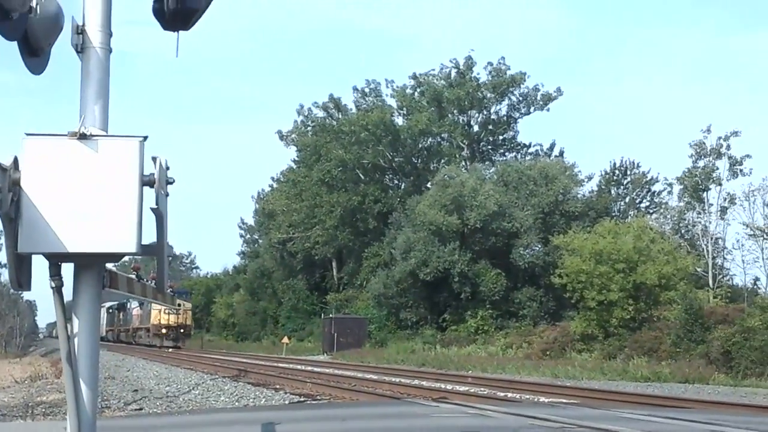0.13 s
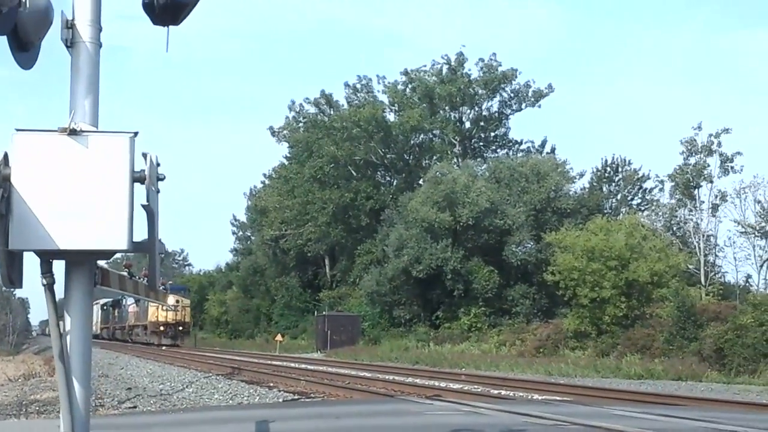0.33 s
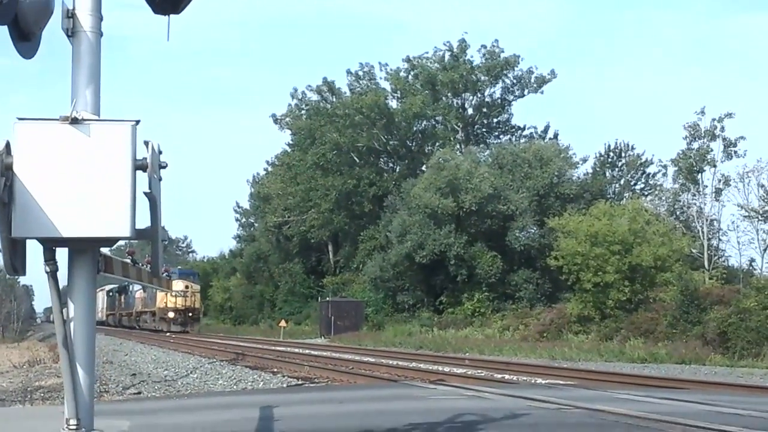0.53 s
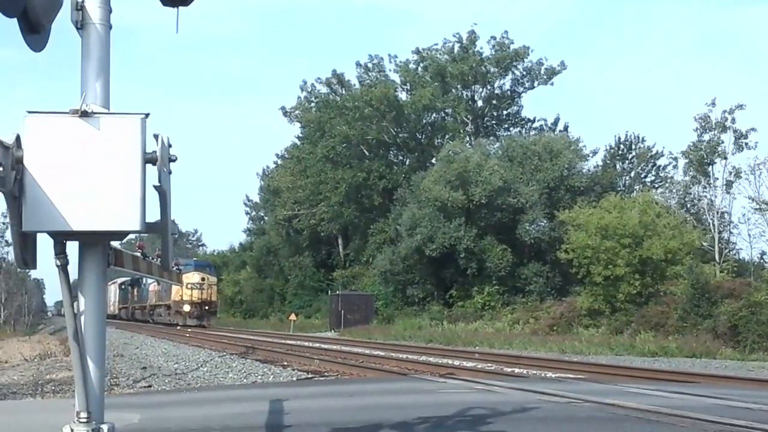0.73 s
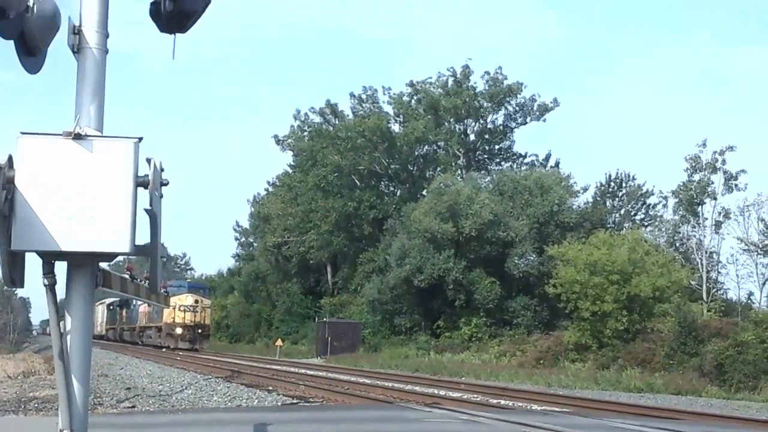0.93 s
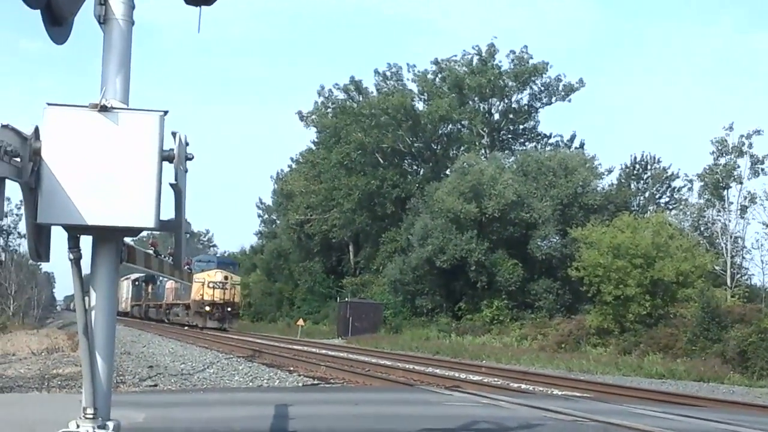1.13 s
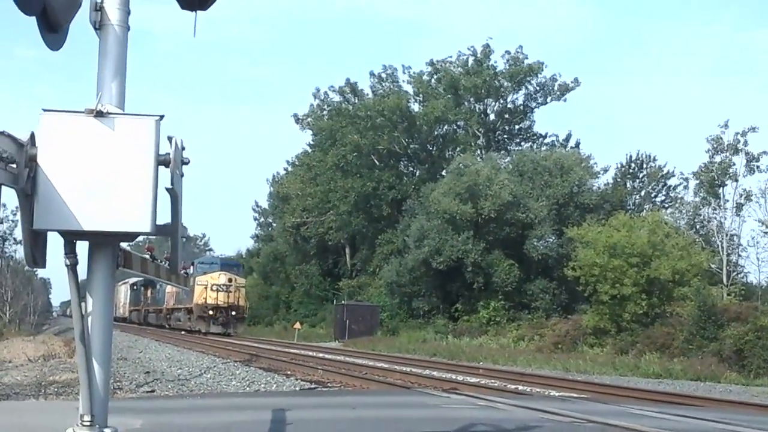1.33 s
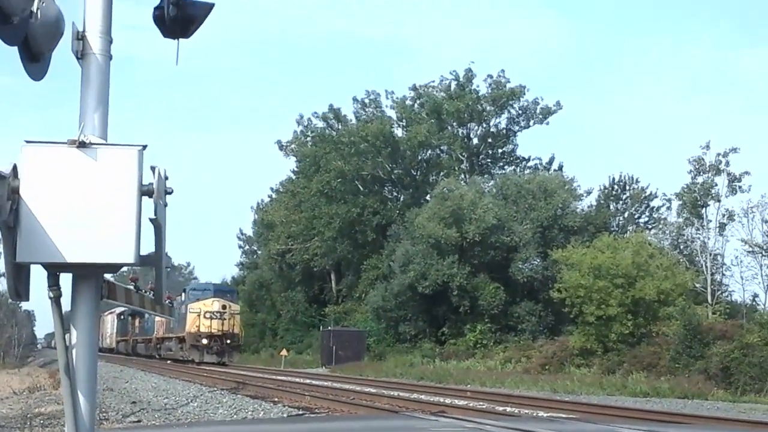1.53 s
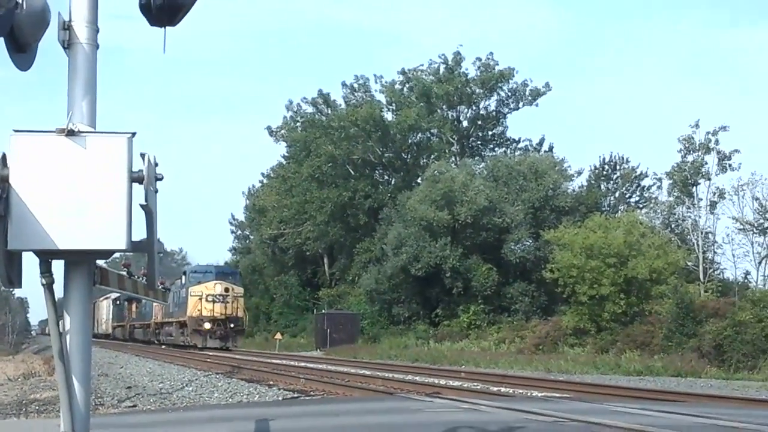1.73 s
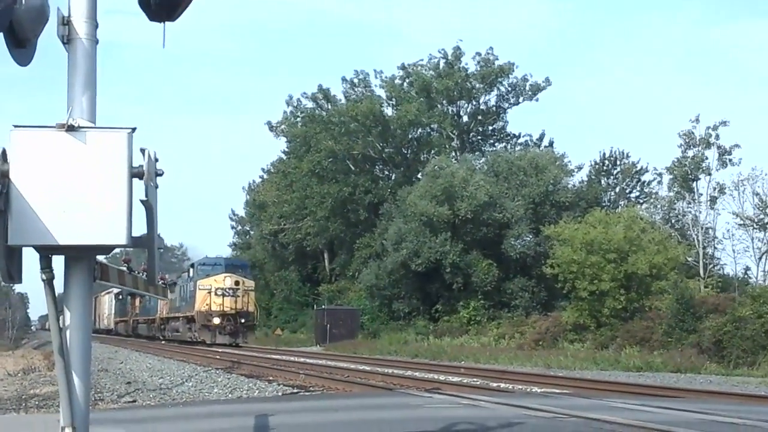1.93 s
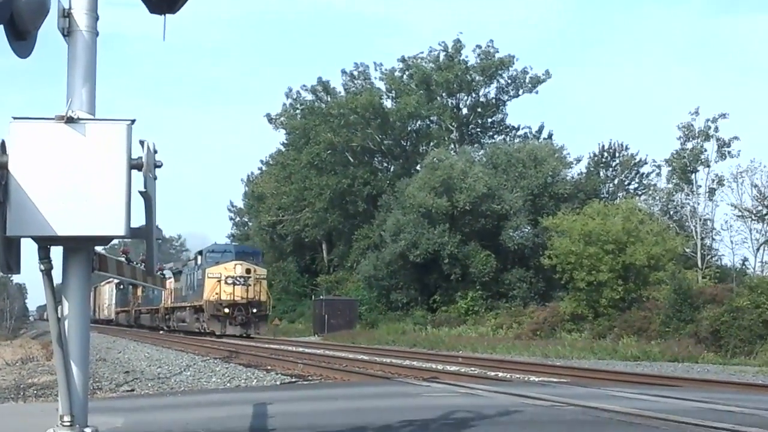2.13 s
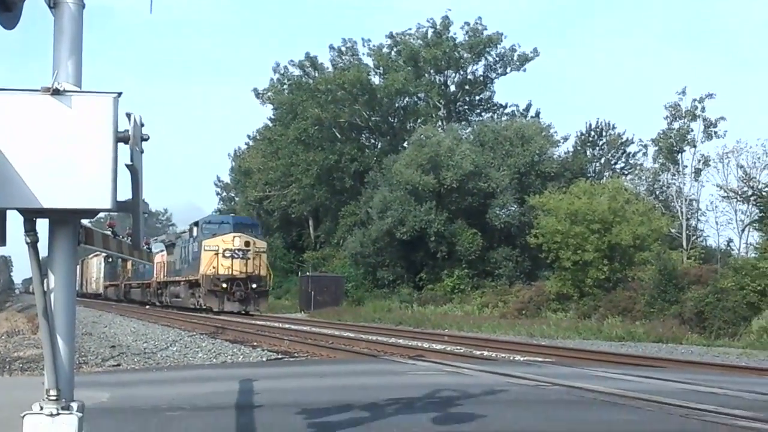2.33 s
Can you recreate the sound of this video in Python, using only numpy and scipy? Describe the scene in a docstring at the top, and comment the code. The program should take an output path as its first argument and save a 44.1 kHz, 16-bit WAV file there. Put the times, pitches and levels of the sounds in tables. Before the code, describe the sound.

A freight locomotive's five-note air horn dominates. Low diesel rumble and soft rail hiss come first; at about 0.2 seconds the chord bursts in, slightly sharp, quickly settling into a loud, brassy, shimmering blast. From roughly 1.4 seconds it sags and dulls, stopping near 1.9. Flat, smeared echoes from trees and distant woods linger over rumble, hiss and faint whine until the end, in wide outdoor stereo.

```python
"""A five-bell air horn on an approaching freight locomotive gives one long blast at a level crossing.
Each bell is a stack of overtones; the chord starts sharp, settles, then sags and dulls as the valve closes.
Trees along the line and distant woods throw it back, as delayed copies lower in pitch and a long noise-like tail.
Diesel rumble and rail hiss, both shaped noise, lie underneath with a faint whine.
The two microphone channels are opposed in the bass."""
import sys
import numpy as np
from scipy import signal
from scipy.fft import rfft, irfft, next_fast_len
from scipy.io import wavfile
from scipy.ndimage import map_coordinates

SR = 44100
rng = np.random.default_rng(int(sys.argv[2]) if len(sys.argv) > 2 else 0)


def master_out(mix):
    """Clip the mix to full scale and print it as 16-bit PCM to the path in sys.argv[1]."""
    frames = np.transpose(np.atleast_2d(mix))
    ceiling = np.clip(frames, -1, 1)
    pcm = np.round(ceiling * 32767).astype(np.int16)
    wavfile.write(sys.argv[1], SR, pcm)


N = 110250
T = np.arange(N) / SR  # time of every sample, in seconds

# The train. Each row: time in seconds, diesel level in dB, rail hiss level in dB, hiss left minus right in dB.
TRAIN_LEVELS = [(0, -35, -31.5, -3), (.3, -32, -31, -5.5), (.7, -35, -19.5, -10.5), (1.3, -32, -22.5, -1),
                (2.0, -29.5, -29.5, -0.5), (2.5, -28.5, -30.5, -1.5)]
# Tone colour of the diesel rumble. Each row: frequency in Hz, level in dB.
RUMBLE_COLOUR = [(20, -20), (32, -14.5), (47, -7), (62, -5.5), (80, -6.5), (98, 0.5), (125, -10),
                 (180, -13.5), (260, -9.5), (400, -17), (900, -22.5), (2000, -52.5)]
# Tone colour of the rail hiss. Each row: frequency in Hz, level in dB.
HISS_COLOUR = [(300, -31.5), (700, -15), (1000, -3), (1300, -11.5), (1900, -4), (3000, -3.5), (4000, -1.5),
               (5200, -0.5), (6300, -11.5), (8000, -20.5), (9500, -46)]
# Likeness of the two channels for sound from all around. Each row: frequency in Hz, likeness from -1 to 1.
CHANNEL_LIKENESS = [(100, -.96), (200, -.95), (330, -0.9), (600, -0.35), (1000, 0.14), (2000, -0.0031)]
# Tone colour of the tree echoes. Each row: frequency in Hz, level in dB.
TREE_COLOUR = [(330, -9.5), (650, -9), (880, -10.5), (1050, 7), (1400, 6), (2500, 1), (5000, 1.5),
               (9000, 4.5)]
# Tone colour of the long tail from the woods. Each row: frequency in Hz, level in dB.
WOODS_COLOUR = [(330, -18.5), (500, -12), (650, -19), (880, -13), (1100, -3), (2000, -5), (3200, -14.5),
                (6000, -7.5)]
# How long the woods ring on. Each row: frequency in Hz, time to fall by 60 dB in seconds.
WOODS_FADE_TIME = [(300, 2.27), (700, 3.21), (2000, 3.52), (5000, 2.64)]
# The four low bells. Each row: fundamental in dB, octave in dB, upper overtones in dB.
LOW_BELL_LEVELS = [(-22.5, -14, -3.5), (-21.5, -21.5, -3.5), (-18, -18.5, 0), (-21.5, -29, 0.5)]
# The top bell, a single row: fundamental in dB, octave in dB, upper overtones in dB.
TOP_BELL_LEVELS = (-12, -40, 6.64)
# Drift of pitch. Each row: time in seconds, low bells in percent, top bell in percent.
PITCH_DRIFT = [(.2, 1.9, .35), (.31, .9, .2), (.4, .45, .05), (.5, .15, 0), (.68, -.2, 0), (1.0, -.1, 0),
               (1.25, -.05, -.05), (1.45, -.7, -.25), (1.72, -1.4, -.85)]
# Air supply. Each row: time in seconds, level in dB, brightness corner in Hz, brassiness in dB.
AIR_SUPPLY = [(.19, 0.5, 1560, -8), (.23, 1.5, 2760, -8), (.28, 4, 4720, -3), (.34, 1, 8340, 1.5),
              (.55, 1, 8100, -0.5), (.85, 4.5, 8000, -1.5), (1.33, 1.5, 7240, 1), (1.5, 3.5, 3240, -1),
              (1.65, 6, 2040, 1.5), (1.78, 2, 1320, 0.5), (1.9, -1.5, 854, 10.5)]
# Upper overtones shared by all bells. Each row: frequency in Hz, level in dB.
OVERTONE_LEVELS = [(950, -23), (1150, -40), (1320, -34), (1550, -34), (1700, -33.5), (2000, -37.5),
                   (2300, -34), (2600, -36.5), (2780, -28), (3250, -36), (3550, -35), (3900, -39),
                   (4300, -35), (5100, -35.5), (6300, -44), (8000, -55.5), (9500, -67)]
# The way to the microphone. Each row: time in seconds, direct level in dB, tree echo level in dB,
# nearness (0 is far, 1 is near, and it may pass 1).
PATH_LEVELS = [(.2, 0.5, -1, 0), (.75, -2, 0.5, 0.04), (1.0, -3, 0.5, .1), (1.35, -2, 2, 0.27),
               (1.62, -6, 3, 1), (1.8, -1, -2, 1.5), (1.95, -2, -6.5, 0.9)]
# Direct sound at the microphone. Each row: frequency in Hz, lead of the left channel in radians.
LEFT_LEAD = [(330, -2.8), (386, -2.7), (445, -1.7), (515, -3.5), (655, -2.95), (770, -2.8), (890, -1.5),
             (1030, -.2), (1300, 1.6), (2000, 7.5), (3300, 20), (5200, 33), (9000, 54)]
# Change of that lead when near. Each row: frequency in Hz, change in radians.
NEAR_LEAD_CHANGE = [(330, 0.61), (386, 0.11), (445, -0.59), (515, 1.64), (655, 0.54), (770, .6),
                    (890, -0.33), (1030, 1.5), (1300, -0.94), (2000, 0.15)]
# Balance of direct sound and tree echoes. Each row: frequency in Hz, left minus right in dB.
LEFT_RIGHT_BALANCE = [(330, -2), (480, 4.5), (650, -1), (1000, -0.5), (1400, 3), (2000, -9), (3000, -6),
                      (5200, -9), (6500, 3.5), (9000, 11.5)]

WHINE_HZ, WHINE_START_DB, WHINE_RISE_DB_PER_S = 926, -39.5, 0.5
# the most sideways trees: share of pitch lost, and how much weaker they are
DOPPLER_LOSS, TREE_FADE_DB = .085, 9.5
TREE_DELAY_SCALE_S = .12  # multiplied by a random factor for each tree

LOW_BELLS_HZ, TOP_BELL_HZ = [330.3, 385.6, 445.6, 513.8], 650.4
START_S, ATTACK_S, RELEASE_S = .172, .045, 0.039
LOW_STOPS_S, TOP_STOP_S = [1.91, 1.94, 1.91, 1.88], 1.815
ROLL_OFF = 4.14  # steepness of the overtones above the brightness corner
# air turbulence on the way: swing in dB, random knots a second, phase swing
SHIMMER_DB, SHIMMER_RATE, SMEAR_RAD_PER_KHZ = 2.5, 7.956, 0.14
# slower fading as the path over the ground changes: swing in dB, random knots a second
FADING_DB, FADING_RATE = 1.73, 3.485
TOP_BELL_ECHO_DB = -5.5  # this bell points down the track, so less of it reaches the trees
TOP_BELL_NEAR_DB = 0.5  # gain per unit of nearness, as the locomotive closes in

TOP_HZ = 9650  # nothing is kept from here up
AGC_DB, AGC_S, AGC_SLOPE = -10.5, 0.3, 0.25  # gain control: level where it bites, averaging time, strength


def amp(db):
    """Turn decibels into gain."""
    return np.exp(np.asarray(db) * np.log(10) / 20)


def unit(x):
    """Scale to an rms (average strength) of 1."""
    return x / np.sqrt(np.mean(x ** 2) + 1e-20)


def along(points, hz):
    """Read a value between (Hz, value) points on a log frequency axis."""
    f, v = np.transpose(points)
    return np.interp(np.log(hz + 1), np.log(f + 1), v)


def curves(rows):
    """Draw one curve over time for each column after the time."""
    s, *cols = np.transpose(rows)
    return [np.interp(T, s, c) for c in cols]


def wobble(rate, size=400):
    """Make a smooth random curve through `rate` random knots a second."""
    s = np.linspace(0, T[-1], size)
    smooth = map_coordinates(rng.standard_normal(size), [s * rate], mode="wrap")
    return np.interp(T, s, smooth)


def filtered(x, response):
    """Change the level and phase of each frequency in x by a response."""
    m = next_fast_len(N + SR // 4)  # spare room at the end
    spectrum = rfft(x, m) * response(np.fft.rfftfreq(m, 1 / SR))
    return irfft(spectrum, m)[..., :N]


def diffuse(pair, colour):
    """Colour two signals and mix them as the microphone hears sound from all around."""
    def response(hz):
        likeness = np.clip(along(CHANNEL_LIKENESS, hz), -.98, .98)
        turn = np.arccos(likeness) / 2
        return amp(along(colour, hz)) * np.array([np.cos(turn), np.sin(turn)])
    mid, side = filtered(pair, response)
    return np.array([mid + side, mid - side])


def diesel_rumble(level_db):
    """The engine is noise shaped towards the bass, with a small random wobble in level."""
    level = amp(level_db + 1.2 * wobble(12))
    return level * unit(diffuse(rng.standard_normal((2, N)), RUMBLE_COLOUR))


def rail_hiss(level_db, pan_db):
    """Wheels on rail make bright noise that shifts between the channels."""
    pan = np.array([pan_db, -pan_db]) / 2
    level = amp(level_db + pan + 0.17 * wobble(6.69))
    return level * unit(diffuse(rng.standard_normal((2, N)), HISS_COLOUR))


def whine():
    """A faint steady tone wavers in level and phase, separately in each channel."""
    pair = []
    for ear in range(2):
        level = amp(WHINE_START_DB + WHINE_RISE_DB_PER_S * T + 4.5 * wobble(6.2))
        pair.append(level * np.sin(2 * np.pi * WHINE_HZ * T + 1.1 * wobble(18)))
    return np.array(pair)


def train():
    """The approaching train adds engine rumble, rail hiss and whine."""
    diesel_db, hiss_db, pan_db = curves(TRAIN_LEVELS)
    return diesel_rumble(diesel_db) + rail_hiss(hiss_db, pan_db) + whine()


def woods(pair):
    """Distant woods smear the sound into a long tail of fading noise, each pitch at its own rate."""
    hz, t, z = signal.stft(rng.standard_normal((2, 2 * SR)), SR, nperseg=256)
    fade = amp(-60 * t / along(WOODS_FADE_TIME, hz)[:, None])
    build_up = 1 - np.exp(-t / 0.045)
    tail = signal.istft(z * fade * build_up, SR, nperseg=256)[1]
    return signal.fftconvolve(pair, tail / np.linalg.norm(tail[0]), axes=1)[:, :N]


def trees(x, count=48):
    """Trees beside the track miss part of the Doppler rise, so their echoes sound flat and late."""
    pair = np.zeros((2, N))
    for ear in pair:
        for i, (place, lag) in enumerate(rng.random((count, 2))):
            aside = ((i + place) / count) ** 1.3  # 0 is ahead, 1 is most sideways
            first_delay = TREE_DELAY_SCALE_S * (.1 + lag * (.4 + aside))
            delay = first_delay + DOPPLER_LOSS * aside * (T - START_S)  # a growing delay lowers the pitch
            ear += amp(-TREE_FADE_DB * aside) * np.interp(T - delay, T, x)
    return unit(pair) * np.std(x)


def bell(hz, levels, stop_s, drift_percent):
    """A diaphragm and its flare give a harmonic series whose top needs full air pressure."""
    first_db, octave_db, upper_db = levels
    level_db, corner_hz, brass_db = curves(AIR_SUPPLY)
    dull = (hz / corner_hz) ** ROLL_OFF
    pitch = hz * (1 + drift_percent / 100) * (T > START_S)
    phase = 2 * np.pi * np.cumsum(pitch) / SR
    out = np.zeros(N)
    for k in range(1, int(TOP_HZ / hz) + 1):
        if k == 1:
            db = first_db
        elif k == 2:
            db = octave_db
        else:
            db = upper_db + brass_db + along(OVERTONE_LEVELS, k * hz)
        shimmer = SHIMMER_DB * wobble(SHIMMER_RATE) + FADING_DB * wobble(FADING_RATE)
        smear = SMEAR_RAD_PER_KHZ * k * hz / 1000 * wobble(SHIMMER_RATE)
        smear += (k > 2) * rng.uniform(0, 2 * np.pi)  # upper overtones start at random phases
        level = amp(db + shimmer) / np.sqrt(1 + dull * k ** ROLL_OFF)
        out += level * np.cos(k * phase + smear)
    attack = np.clip((T - START_S) / ATTACK_S, 0, 1) ** 2
    release = np.clip((stop_s - T) / RELEASE_S + .5, 0, 1)
    return out * attack * release * amp(level_db)


def horn():
    """Five bells sound one chord, heard directly, off the trees and from the woods."""
    low_drift, top_drift = curves(PITCH_DRIFT)
    direct_db, echo_db, nearness = curves(PATH_LEVELS)
    low = sum(bell(hz, levels, stop, low_drift)
              for hz, levels, stop in zip(LOW_BELLS_HZ, LOW_BELL_LEVELS, LOW_STOPS_S))
    top = bell(TOP_BELL_HZ, TOP_BELL_LEVELS, TOP_STOP_S, top_drift)
    top = amp(TOP_BELL_NEAR_DB * nearness) * top

    sides = np.array([[.5], [-.5]])  # half of each difference goes to the left, half to the right
    far = filtered(low + top, lambda hz: np.exp(1j * sides * along(LEFT_LEAD, hz)))
    close = filtered(far, lambda hz: np.exp(1j * sides * along(NEAR_LEAD_CHANGE, hz)))
    direct = amp(direct_db) * (far + np.clip(nearness, 0, 1) * (close - far))

    echoes = trees(low + amp(TOP_BELL_ECHO_DB) * top)
    tree_sound = amp(echo_db) * diffuse(echoes, TREE_COLOUR)
    balanced = filtered(direct + tree_sound, lambda hz: amp(sides * along(LEFT_RIGHT_BALANCE, hz)))
    return balanced + diffuse(woods(echoes), WOODS_COLOUR)


def scene():
    """The horn sounds over the approaching train."""
    return horn() + train()


def record(dry):
    """Gain control ducks loud sound, peaks beyond full scale clip, and the band ends steeply."""
    keep = np.exp(-1 / (AGC_S * SR))
    power = signal.lfilter([1 - keep], [1, -keep], np.mean(dry ** 2, axis=0))
    gain = (1 + power / amp(AGC_DB) ** 2) ** -AGC_SLOPE
    held = np.clip(dry * gain, -1, 1)
    return filtered(held, lambda hz: hz < TOP_HZ)


dry = scene()
out = record(dry)
master_out(out)
```